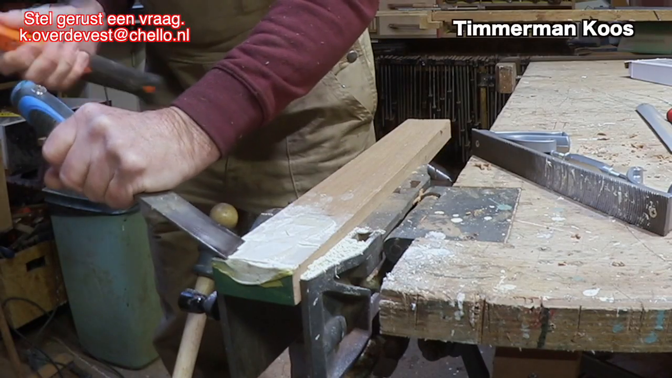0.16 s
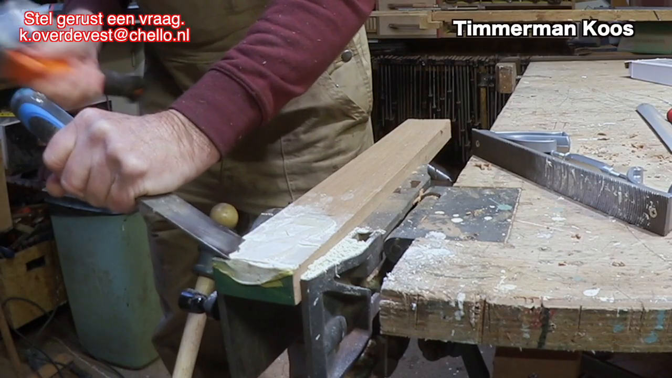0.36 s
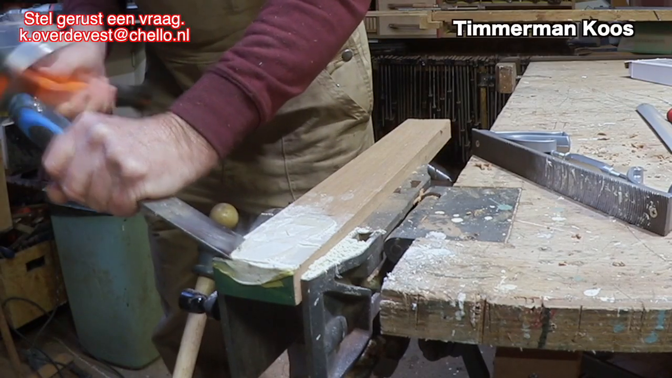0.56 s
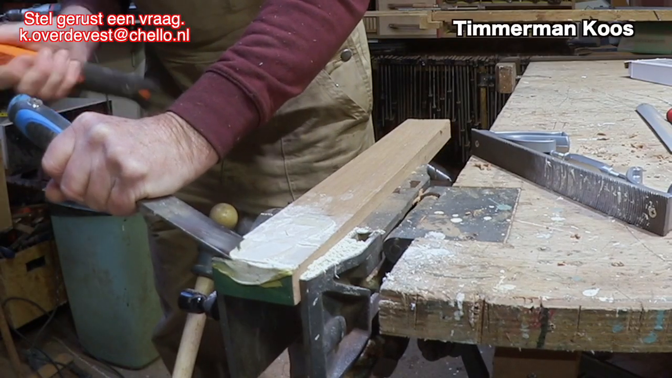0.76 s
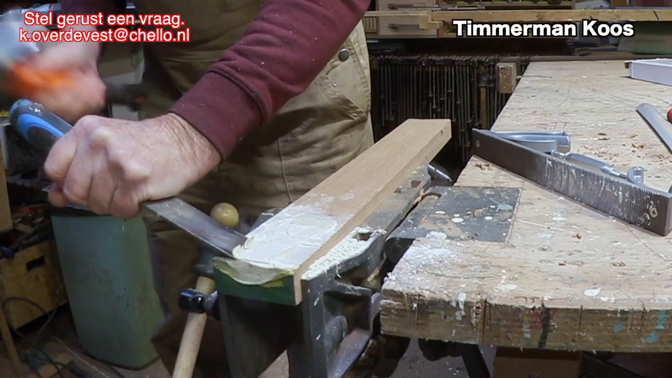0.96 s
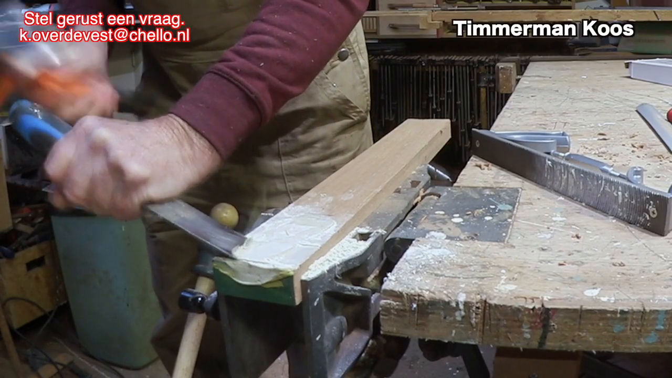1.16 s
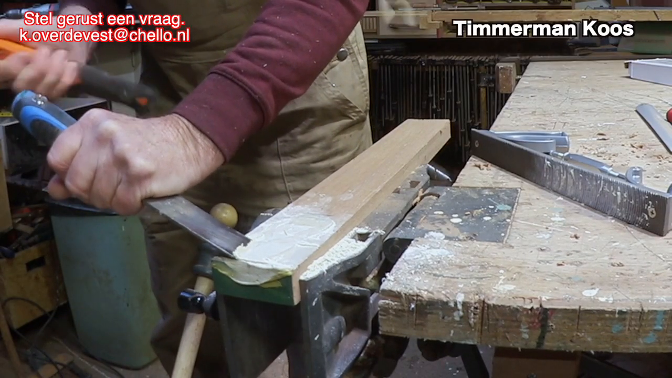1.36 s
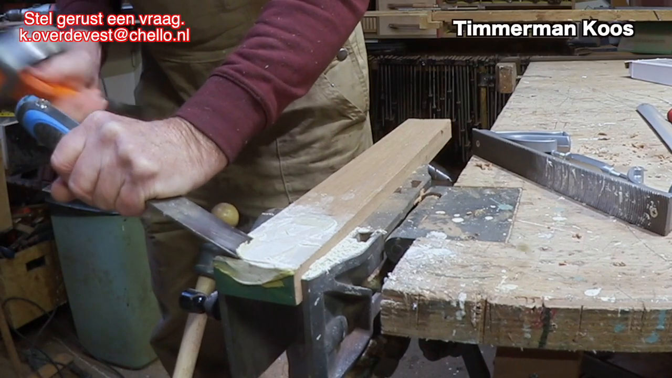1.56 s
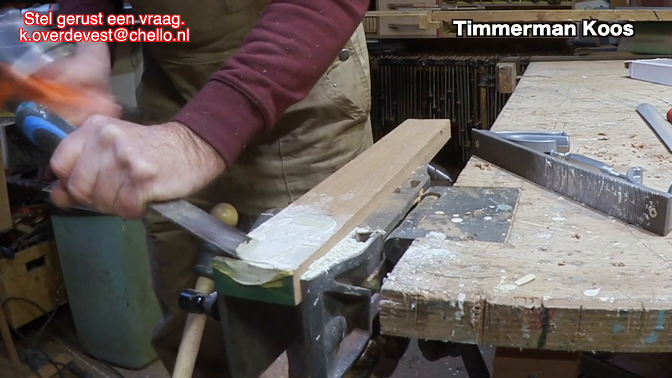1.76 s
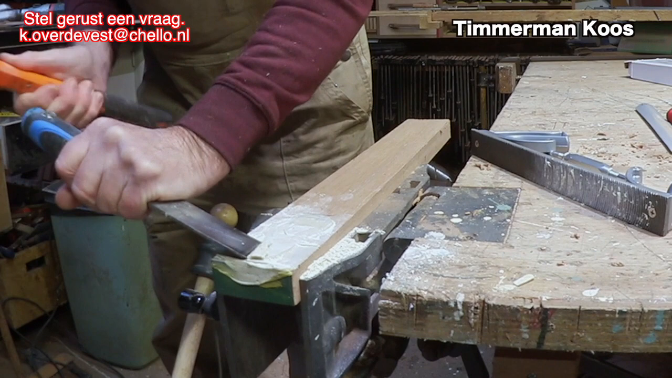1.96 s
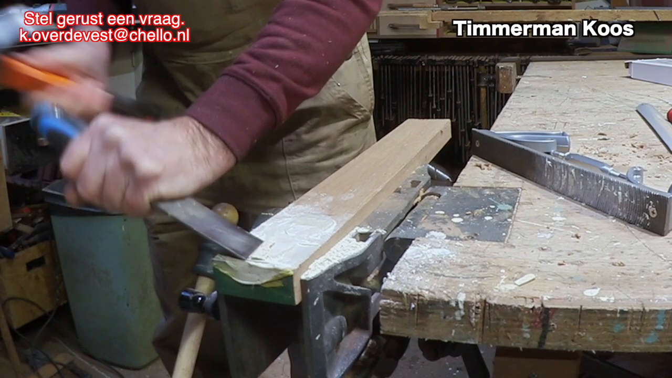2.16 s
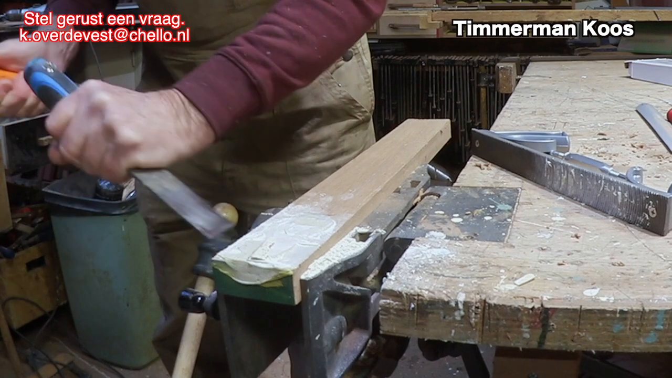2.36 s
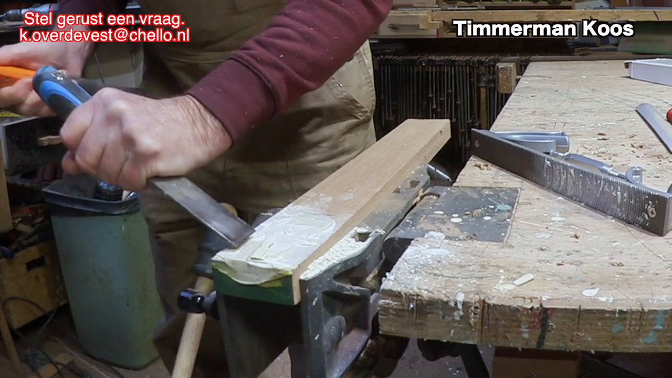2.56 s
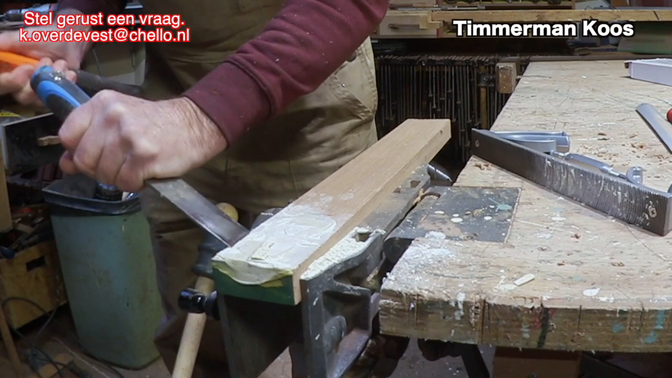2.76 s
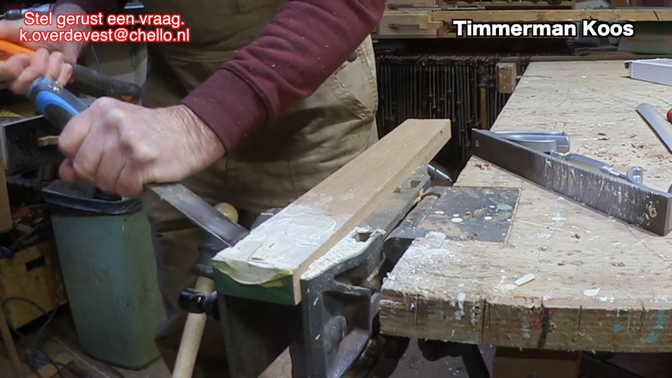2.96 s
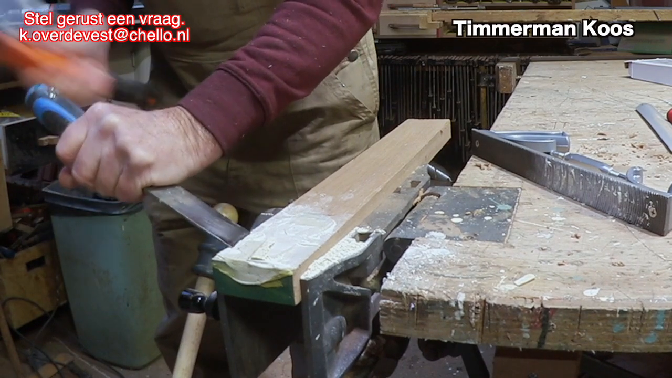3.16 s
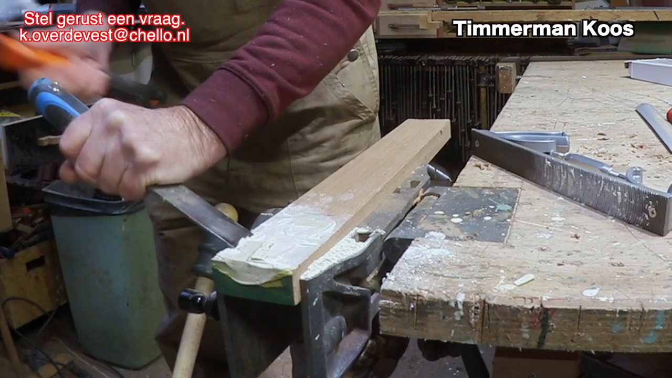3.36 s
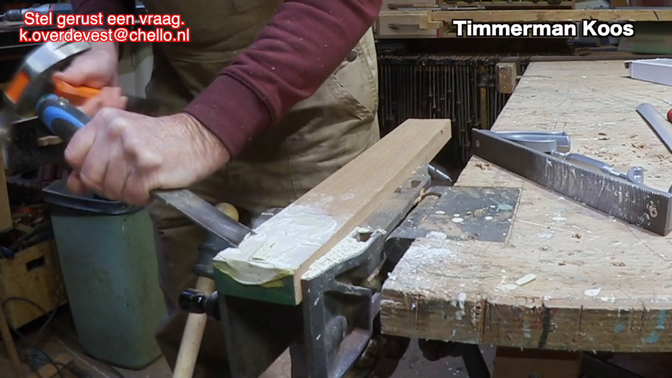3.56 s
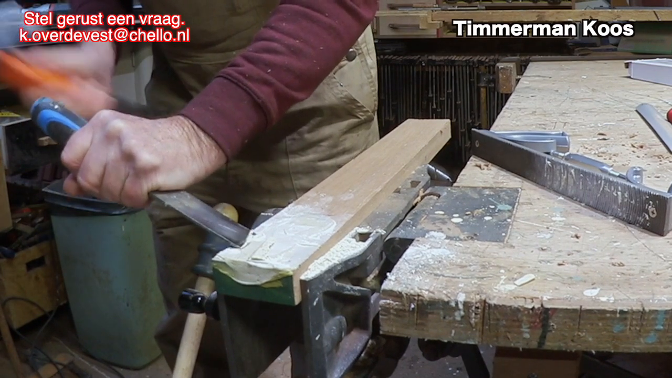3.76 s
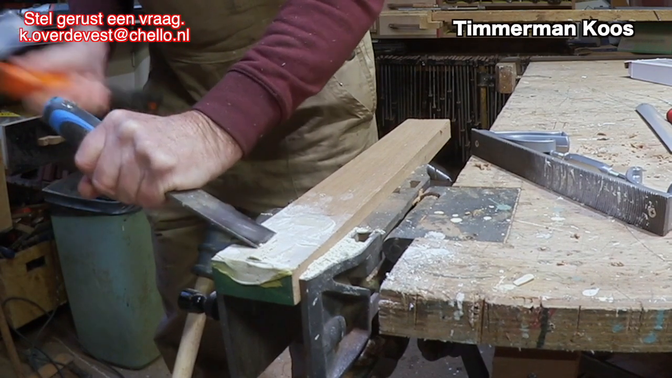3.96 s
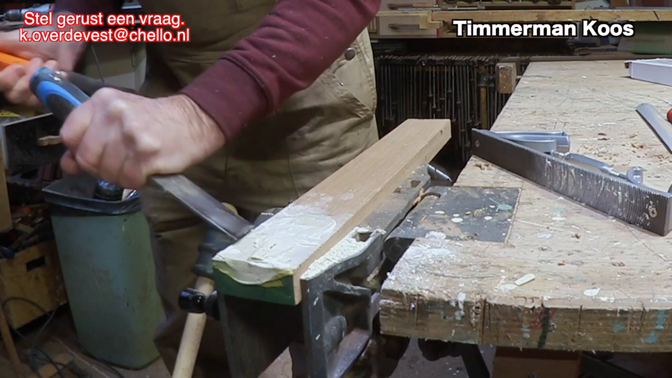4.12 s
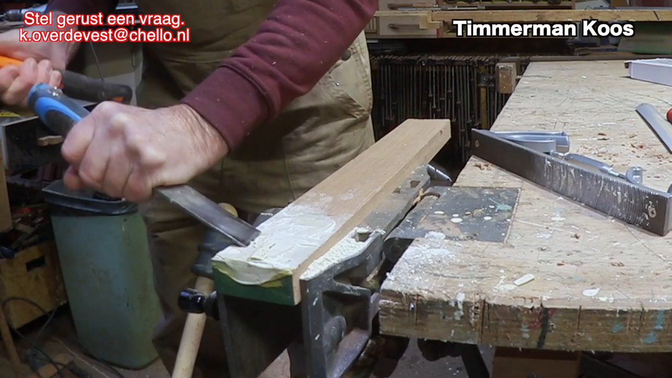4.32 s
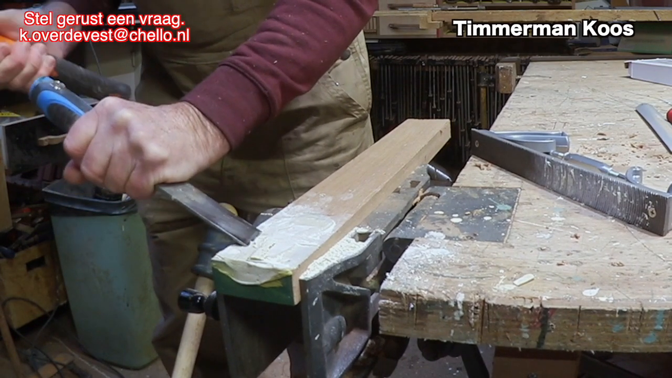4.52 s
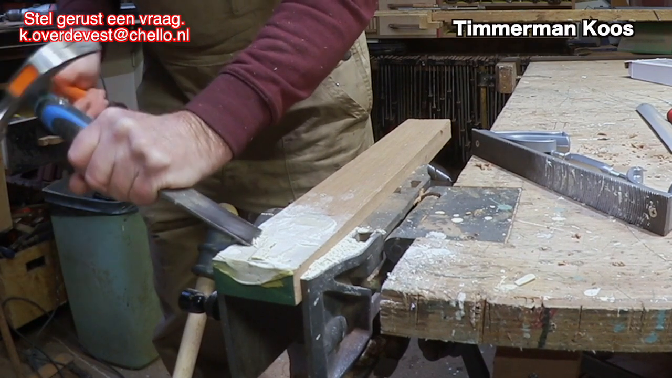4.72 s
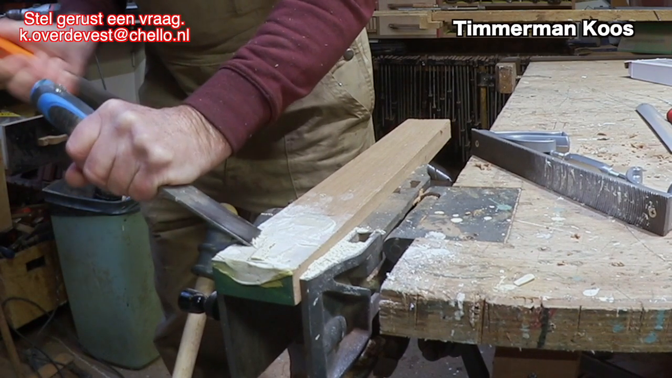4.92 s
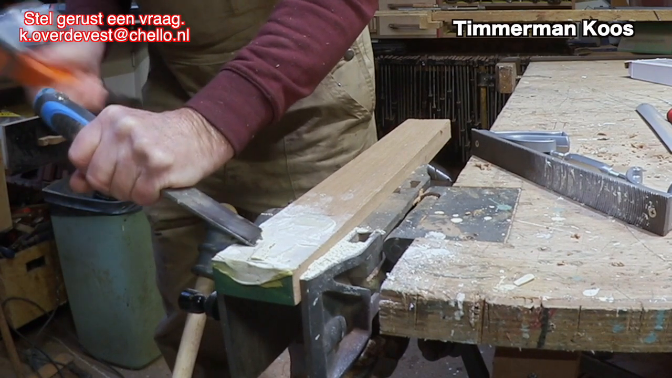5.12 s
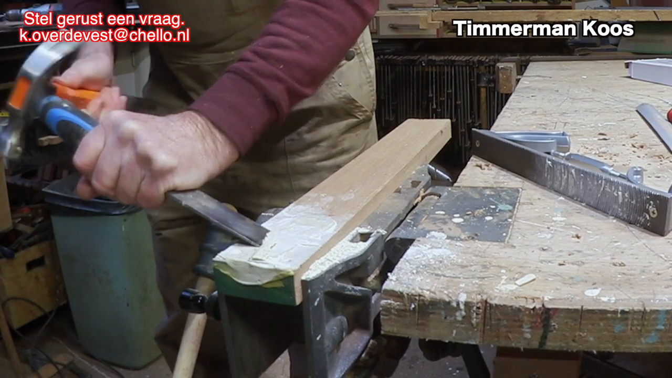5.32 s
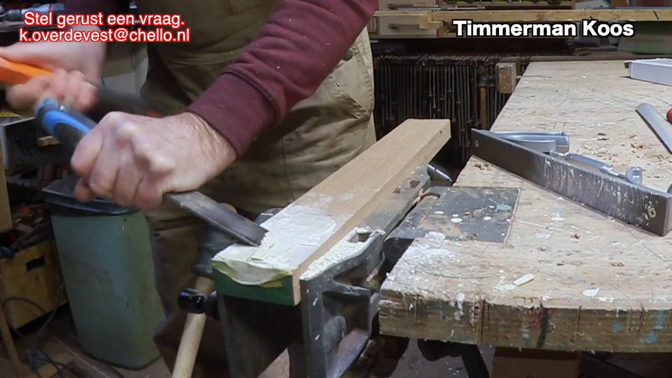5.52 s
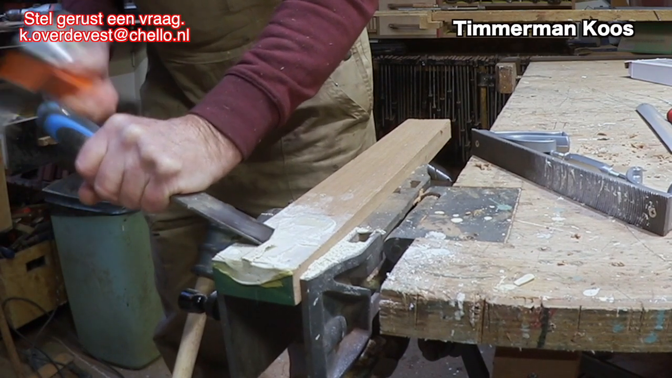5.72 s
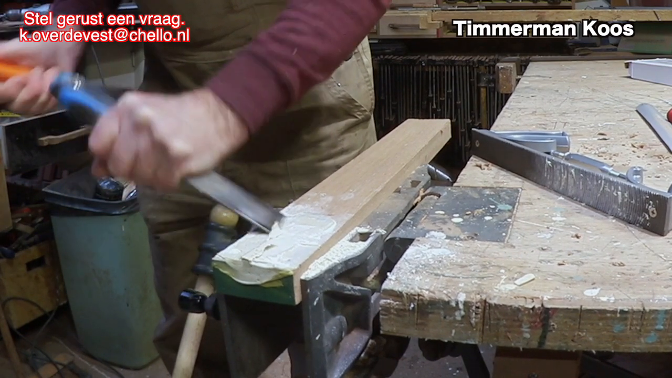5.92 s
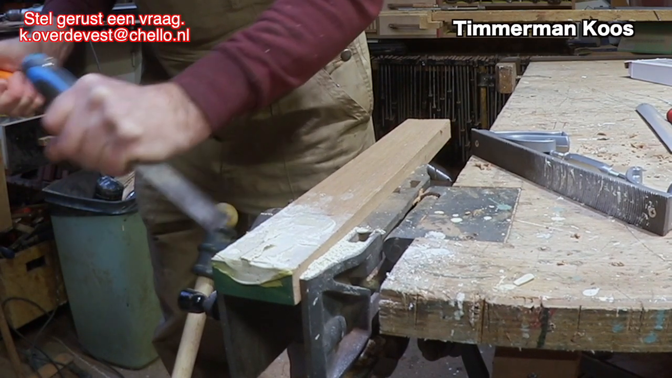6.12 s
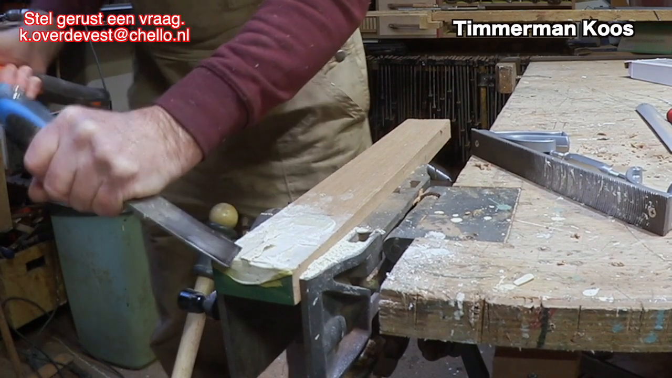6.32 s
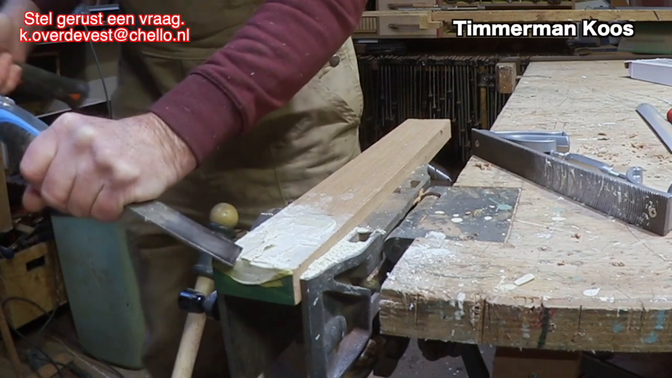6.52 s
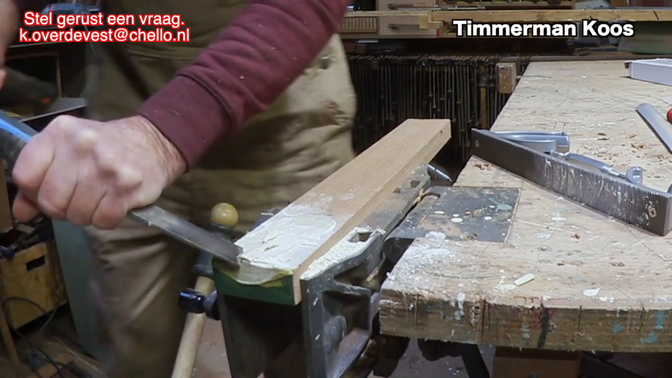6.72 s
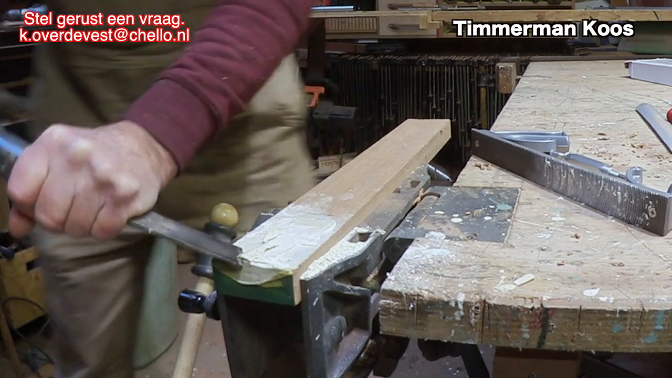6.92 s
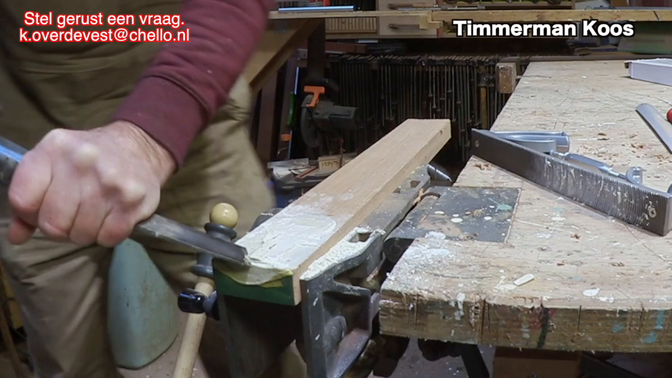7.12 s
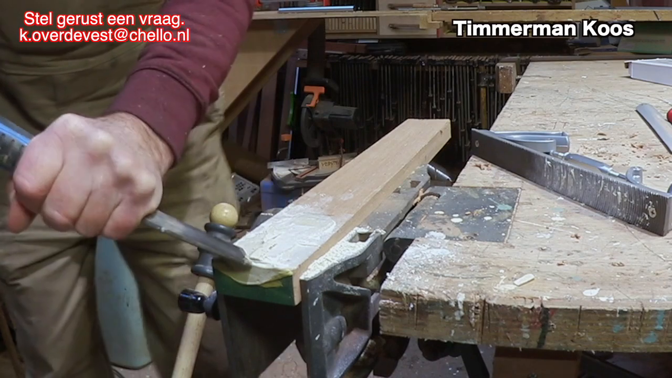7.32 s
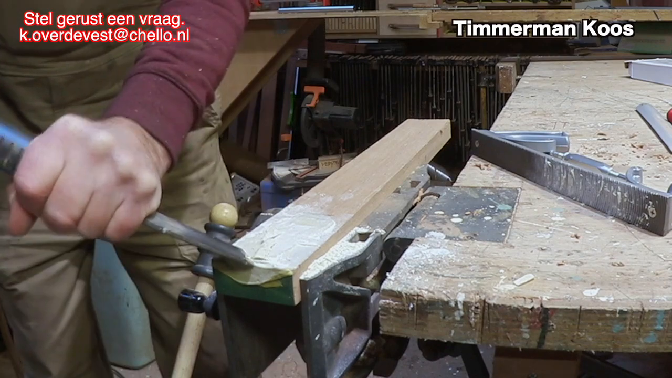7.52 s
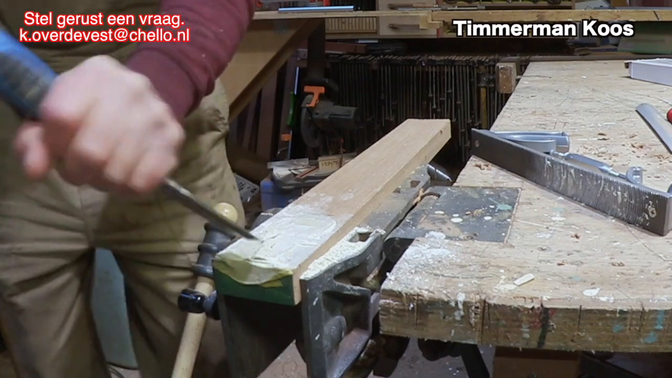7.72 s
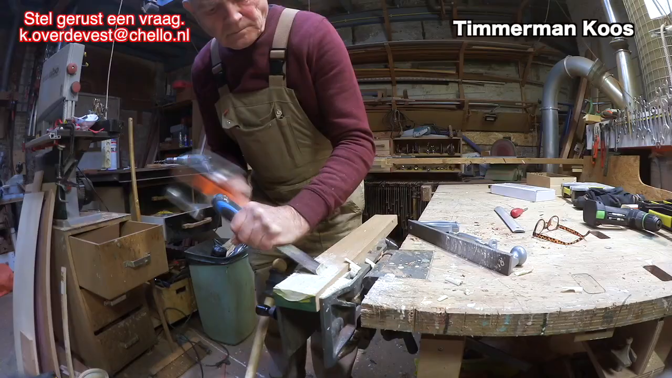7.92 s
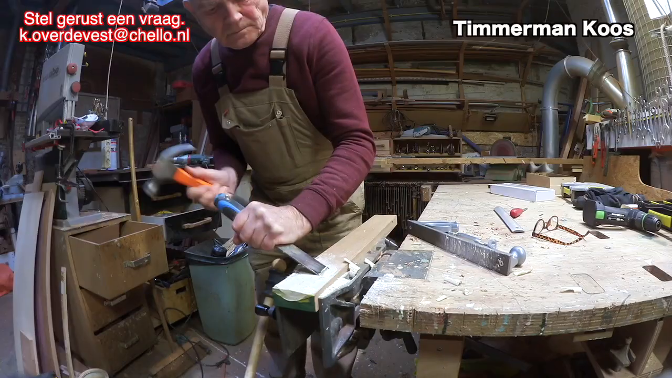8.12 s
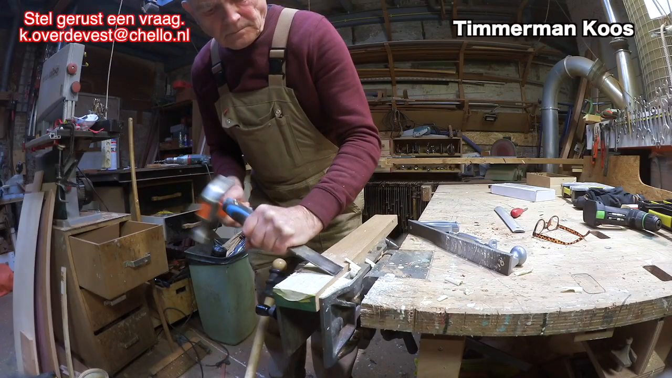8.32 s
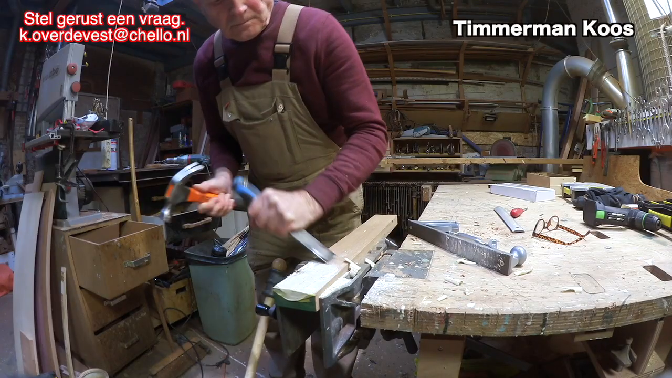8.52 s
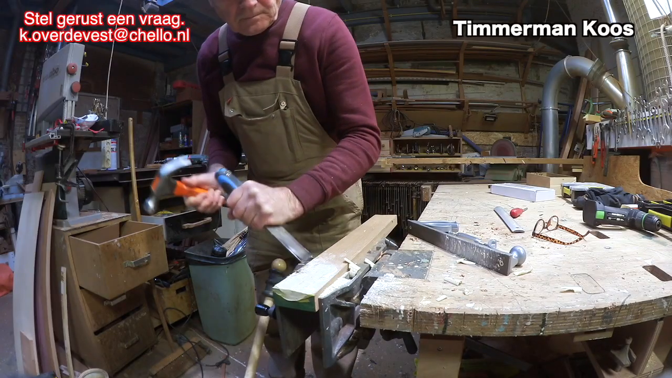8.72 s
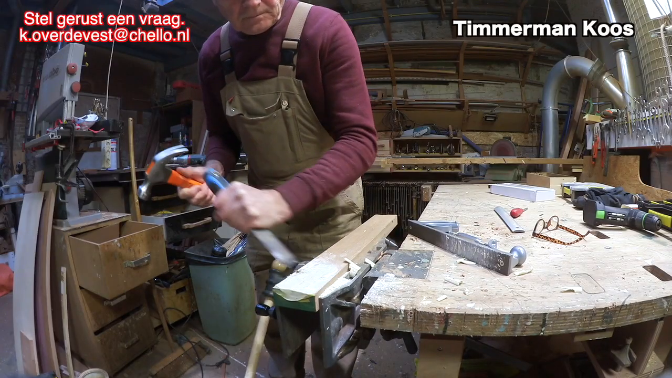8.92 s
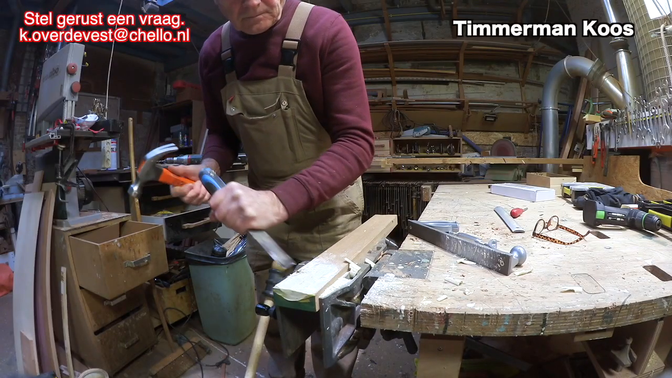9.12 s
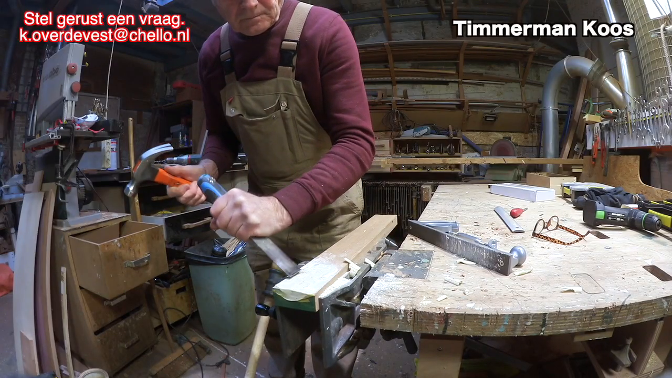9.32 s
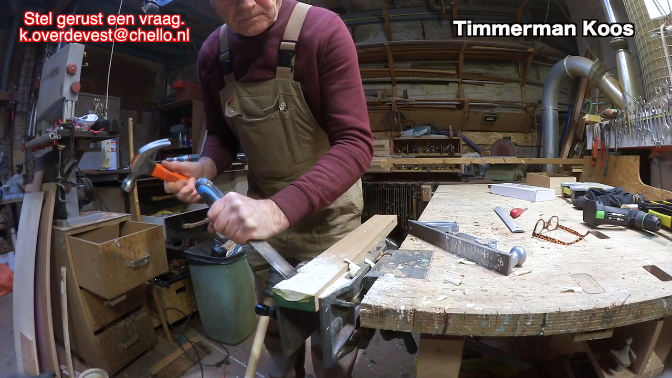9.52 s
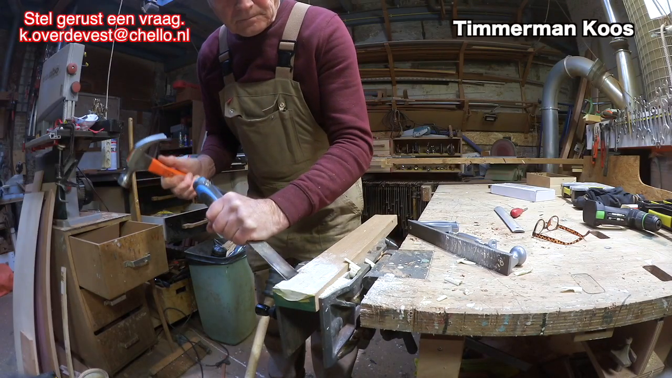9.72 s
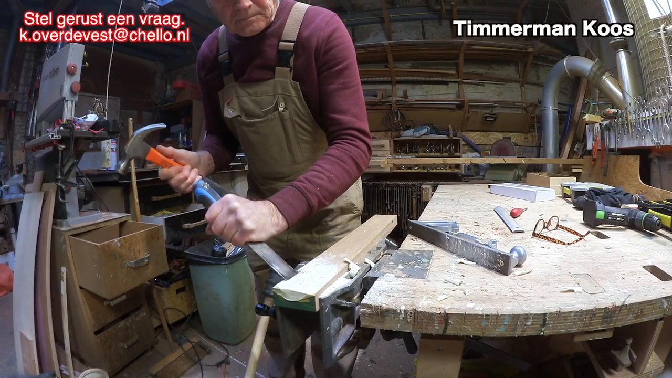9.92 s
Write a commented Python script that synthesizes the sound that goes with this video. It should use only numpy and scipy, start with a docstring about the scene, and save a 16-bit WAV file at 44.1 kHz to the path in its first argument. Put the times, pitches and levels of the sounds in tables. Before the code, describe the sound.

In a hard-walled workshop, a hammer strikes a chisel set in a clamped board: eight steady, loud cracks, a short pause, then shorter runs. Between them the blade slides grittily, knocks and rings on the wood, and chips snap. Soft hollow ticks sit behind. The close microphone is overloaded by each blow, its dense short echo held flat before dying.

```python
"""Hammer and chisel at the bench

A steel hammer drives a wood chisel into a board held in a bench vice, in a hard-walled workshop.
Blows are filtered pulses with wood and steel resonances and a noise-built echo; they overload the
recorder, whose limiter holds the echo flat before letting it die. Between the runs the chisel is set
down (ringing pulses) and slid on the wood (gritty noise), chips drop (crackle), and something ticks
softly behind (dull pulses) over quiet air noise."""
import sys
import numpy as np
from scipy import signal
from scipy.fft import rfft, irfft, next_fast_len
from scipy.io import wavfile
from scipy.ndimage import uniform_filter1d

SR = 44100
rng = np.random.default_rng(int(sys.argv[2]) if len(sys.argv) > 2 else 0)


def volts_from_decibels(level):
    """Turn decibel levels (scalar or array-like) into linear amplitude factors."""
    exponent = np.asarray(level, float) / 20
    return 10 ** exponent


def unload_wav(signal):
    """Save mono or channel-first audio to the path in sys.argv[1] as 16-bit WAV at rate SR, clipped to [-1, 1]."""
    wavfile.write(
        sys.argv[1],
        SR,
        np.round(np.clip(np.atleast_2d(signal).T, -1, 1) * 32767).astype(np.int16),
    )


N = 440118
LEAD = SR // 4   # samples of track ahead of time zero
HZ = np.fft.rfftfreq(4096, 1 / SR)
LOW = 1 / (1 + (HZ / 400) ** 2)   # share of the bench
BOARD = 1 / (1 + np.log2((HZ + 1) / 1000) ** 2 / .25)   # share of the board in the vice


def at_hz(points, hz):
    """Read a (Hz, value) table on a log-frequency axis."""
    f, v = np.transpose(points)
    return np.interp(np.log(hz + 1), np.log(f), v)


def rings_db(rings, hz):
    """Resonance humps, in dB."""
    return sum(db / (1 + (2 * (hz - f) / width) ** 2) for f, width, db in rings)


def strike(colour_db):
    """The sharpest causal (minimum-phase) pulse with this spectrum, peak 1."""
    cepstrum = irfft(np.log(volts_from_decibels(colour_db)))
    half = len(cepstrum) // 2
    cepstrum[1:half] *= 2
    cepstrum[half + 1:] = 0
    pulse = irfft(np.exp(rfft(cepstrum)))
    return pulse / np.abs(pulse).max()


def add(track, s, pulse):
    """Lay a pulse on a track that starts a quarter second early."""
    i = round(s * SR) + LEAD
    track[i:i + len(pulse)] += pulse[:len(track) - i]


def coloured(points, rings=()):
    """Steady noise with this spectrum and these resonances, rms 1."""
    size = next_fast_len(N)
    hz = np.fft.rfftfreq(size, 1 / SR)
    gain = volts_from_decibels(at_hz(points, hz) + rings_db(rings, hz))
    x = irfft(rfft(rng.standard_normal(size)) * gain, size)[:N]
    return x / x.std()


def strokes(s, db, held_s, fade_db_per_s, rise_db_per_s):
    """Gain of strokes that rise, hold and fade; their powers add."""
    points = np.arange(0, N, 32)
    since_full_s = points[:, None] / SR - s - .008   # full level 8 ms after the start
    rise_db = np.minimum(np.abs(rise_db_per_s) * since_full_s, 0)
    fade_db = np.abs(fade_db_per_s) * np.maximum(since_full_s - np.abs(held_s), 0)
    level_db = np.maximum(db + rise_db - fade_db, -140)
    return np.interp(np.arange(N), points, np.sqrt(np.sum(volts_from_decibels(level_db) ** 2, axis=1)))


def workshop(x, wet_db):
    """Dense echoes: every band of noise builds up, then dies at its own rate."""
    # Reverberation time. Each row: frequency in Hz, time to fall 60 dB in s.
    room_t60 = [(100, 0.62), (260, 0.59), (700, 0.45), (1840, 0.36), (4850, 0.33), (9000, 0.26),
                (14000, 0.061)]
    # Echo colour; shelves and wood swallow the top. Each row: frequency in Hz, relative gain in dB.
    room_gain = [(300, 7), (3000, -1), (9000, -3.5), (12000, -14.5), (16000, -23)]
    build_cycles = 1.2
    t = np.arange(SR) / SR
    edges_hz = 30 * 2 ** np.arange(0, 9.4, .5)
    white = rng.standard_normal((2, SR))   # neighbouring bands use different noise
    echo = np.zeros(SR)
    for k, (low, high) in enumerate(zip(edges_hz, edges_hz[1:])):
        hz = np.sqrt(low * high)
        sos = signal.butter(2, [low, high], "band", fs=SR, output="sos")
        band = signal.sosfilt(sos, white[k % 2])
        build = 1 - np.exp(-t / (0.00077 + build_cycles / hz))
        echo += band * build * volts_from_decibels(at_hz(room_gain, hz) - 60 * t / at_hz(room_t60, hz))
    echo /= np.sqrt(np.sum(echo ** 2))
    return (x + volts_from_decibels(wet_db) * signal.oaconvolve(x, echo)[:len(x)])[LEAD:]


def background():
    """Quiet workshop air is steady coloured noise; an even hiss sets in abruptly near the end."""
    # Air spectrum. Each row: frequency in Hz, relative density in dB per Hz.
    air_colour = [(18, -35), (30, -2), (291, -7), (432, -3.5), (676, -16.5), (1940, -13.5), (5300, -19),
                  (6380, -19.5), (10500, -26), (15200, -33), (16500, -45)]
    # Hiss spectrum. Each row: frequency in Hz, relative density in dB per Hz.
    hiss_colour = [(60, 26), (400, 2), (2500, 10), (8000, -3), (15600, -6), (15900, -37)]
    air_db, hiss_db, hiss_from_s = -68, -58, 9.557
    hiss_on = np.arange(N) >= hiss_from_s * SR
    return volts_from_decibels(air_db) * coloured(air_colour) + volts_from_decibels(hiss_db) * coloured(hiss_colour) * hiss_on


def soft_sounds():
    """Hollow background ticks and dull bumps of hand or handle on the bench, as filtered pulses."""
    # Ticks. Each row: start in s, peak in dB.
    tick_rows = [(2.446, -49), (2.596, -49.5), (2.755, -51.5), (4.149, -46.5), (4.306, -41), (4.611, -57),
                 (5.969, -42.5), (6.117, -41), (6.276, -44), (6.578, -48), (8.611, -44), (8.763, -48.5),
                 (8.845, -56), (8.928, -51), (9.086, -59), (9.227, -53.5), (9.371, -65)]
    # Tick spectrum. Each row: frequency in Hz, relative level in dB.
    tick_colour = [(150, -36), (350, -18), (440, 2), (500, -3), (560, 0), (660, -16), (1200, -30),
                   (2600, -32), (5000, -52)]
    # Bumps. Each row: start in s, peak in dB, centre in Hz.
    bump_rows = [(2.817, -51.5, 190), (2.899, -53, 277), (4.341, -40, 210), (5.974, -41, 408),
                 (6.388, -42, 280), (6.859, -52, 248), (6.933, -37, 256), (7.939, -45, 409),
                 (9.656, -41.5, 211), (9.678, -48, 178), (9.78, -45, 323), (9.797, -40, 267),
                 (9.884, -49.5, 280)]
    out = np.zeros(N + LEAD)
    for s, db in tick_rows:
        add(out, s, volts_from_decibels(db) * strike(at_hz(tick_colour, HZ)))
    for s, db, hz in bump_rows:
        colour_db = np.maximum(-16.0 * np.log2((HZ + 20) / hz) ** 2, -70)
        add(out, s, volts_from_decibels(db) * strike(colour_db))
    return out


def handling():
    """Sliding steel on wood is gritty noise; the bench rumbles under the hands."""
    # Blade slides. Each row: start in s, scrape level in dB, fine bright scrape level in dB,
    # held time in s, fade in dB per s.
    slide_rows = [(2.79, -58.5, -71, .005, 400), (2.85, -69.5, -84, .13, 100), (2.985, -62, -69, .005, 202),
                  (3.02, -68, -77, .08, 101), (3.1, -64, -70.5, .15, 103), (4.14, -117, -72, .03, 121),
                  (4.323, -46.5, -57.5, .005, 246), (4.5, -65.5, -71, .03, 76), (5.878, -49, -55, .08, 185),
                  (6.198, -51.5, -71, .008, 303), (6.25, -64, -72, .12, 100), (6.376, -48, -53.5, .05, 120),
                  (6.52, -61.5, -64.5, .32, 100), (6.848, -50, -53, .01, 106),
                  (7.26, -44, -48.5, .008, 354), (7.314, -47.5, -51.5, .01, 270),
                  (7.6, -55, -54.5, .11, 182), (7.83, -56.5, -58.5, .09, 116),
                  (7.962, -50, -67, .02, 201.5), (8.488, -51, -53.5, .065, 216),
                  (8.68, -58, -66, .005, 452), (8.84, -66.5, -72, .005, 148.5), (8.901, -74, -77.5, .2, 30),
                  (9.43, -82, -70, .005, 194), (9.557, -62, -54, .02, 55), (9.808, -55, -54.5, .025, 300),
                  (9.85, -79, -67, .13, 50)]
    # The blade sings as it slides. Each row: frequency in Hz, width in Hz, gain in dB.
    slide_rings = [(2620, 110, 3.5), (3100, 200, 1.5), (5200, 160, 1.5)]
    # Scrape spectrum. Each row: frequency in Hz, relative density in dB per Hz.
    scrape_colour = [(350, -26.5), (600, -2.5), (646, -16.5), (884, -10), (1690, -9.5), (1810, -8),
                     (3040, -10.5), (4300, -17.5), (5590, -39), (9460, -120)]
    # Fine scrape spectrum. Each row: frequency in Hz, relative density in dB per Hz.
    fine_colour = [(2530, -22.5), (4300, -3), (5540, 5), (8360, 0), (12700, -19), (13400, -34.5),
                   (16000, -38)]
    # Bench rumbles. Each row: start in s, level in dB, held time in s, fade in dB per s.
    shift_rows = [(2.79, -57, 0.023, 111), (3.0, -68, 0.042, 81), (3.17, -73, 0.072, 110.5),
                  (4.14, -63, 0.016, 102), (4.325, -47.5, 0.067, 149), (5.881, -54.5, 0.038, 72),
                  (6.02, -62.5, 0.025, 100), (6.385, -54, 0.027, 120), (6.52, -71, 0.28, 100),
                  (6.848, -52.5, 0.011, 110), (7.24, -58.5, .09, 153), (7.59, -91, 0.016, 170),
                  (7.89, -54, 0.076, 201.5), (8.49, -52, 0.044, 93), (8.86, -68.5, 0.043, 50),
                  (9.557, -61.5, 0.32, 100), (9.805, -57, 0.033, 200), (9.85, -63.5, .13, 100)]
    # Rumble spectrum. Each row: frequency in Hz, relative density in dB per Hz.
    rumble_colour = [(24, -43), (40, -14.5), (134, -13), (189, -4), (362, -6.5), (501, -21), (641, -11),
                     (900, -14.5), (1170, -42.5), (1980, -120)]
    slide_rise_db_per_s, shift_rise_db_per_s = 1493, 700
    s, scrape_db, fine_db, held_s, fade = np.transpose(slide_rows)
    slow_noise = uniform_filter1d(rng.standard_normal(N), size=300) * np.sqrt(300)
    grit = volts_from_decibels(2.2 * slow_noise)   # 2.2 dB rms
    coarse = strokes(s, scrape_db, held_s, fade, slide_rise_db_per_s) * coloured(scrape_colour, slide_rings)
    fine = strokes(s, fine_db, held_s, fade, slide_rise_db_per_s) * coloured(fine_colour, slide_rings)
    rumble = strokes(*np.transpose(shift_rows), shift_rise_db_per_s) * coloured(rumble_colour)
    return grit * (coarse + fine) + rumble


def chips():
    """A chip snapping or landing is a few ms of crackle around its own pitch."""
    # Each row: start in s, peak in dB, centre in Hz, loss one octave away in dB (sign ignored).
    chip_rows = [(2.6774, -47.5, 2220, 18), (4.1848, -32, 2860, -11), (4.4782, -43, 3140, -2),
                 (4.54, -48.5, 2940, 32), (5.8835, -23, 5180, 8.5), (6.034, -58, 2770, 6),
                 (6.3475, -47, 2340, 27), (6.577, -45, 5790, 24), (6.637, -35.5, 3070, -4),
                 (6.699, -43, 6010, 21), (6.822, -42, 2740, 18), (7.2408, -30.5, 2000, 4),
                 (7.6082, -41, 2860, 13.5), (7.633, -32.5, 2960, 4), (7.667, -29, 2170, 0),
                 (7.6994, -36.5, 3390, 18), (8.498, -30, 5210, 9), (8.525, -30, 2980, 19),
                 (8.5512, -33, 3040, 12), (8.8454, -50, 2460, 12), (9.8129, -22, 7440, 6),
                 (9.8307, -26.5, 2880, 25)]
    out = np.zeros(N + LEAD)
    decay = np.exp(-np.arange(300) / SR / .002)
    crackle = rng.standard_normal((len(chip_rows), 300)) * decay
    for (s, db, hz, fall_db), burst in zip(chip_rows, crackle):
        colour_db = -abs(fall_db) * np.log2((HZ + 50) / hz) ** 2 - 5.4 * (HZ / 11000) ** 4
        pulse = np.convolve(strike(colour_db), burst)
        add(out, s, volts_from_decibels(db) * pulse / np.abs(pulse).max())
    return out


def knocks():
    """The blade is set down on the wood, rings briefly and settles: two pulses with resonances."""
    # Each row: start in s (sounds 2 ms later), pulse peak in dB, low gain in dB, bright gain in dB,
    # blade ring in dB.
    knock_rows = [(2.795, -41, -9, -7, 19), (2.987, -43, -6, -13, 18), (4.326, -24.5, 4, -10, 17),
                  (5.944, -27.5, -8, -2, 17.5), (6.201, -48, -19.5, -16, 21), (6.376, -31, -23, -20, 17.5),
                  (6.849, -34.5, 24, -23, 8), (7.266, -31, 12, -11.5, -1), (7.322, -35.5, -5, 19.5, 14.5),
                  (7.712, -33.5, -11.5, 11.5, 21), (7.897, -33.5, 15, 6.5, 4), (7.957, -30, 7, -15, 1)]
    # Knock spectrum. Each row: frequency in Hz, relative level in dB.
    knock_colour = [(47, -40), (80, -45.5), (248, -19), (1490, -15.5), (1700, -5), (2220, -49),
                    (3030, -17.5), (8790, -22.5), (16000, -77)]
    # Knock resonances. Each row: frequency in Hz, width in Hz, gain in dB.
    knock_rings = [(280, 68, 0), (680, 120, 9), (950, 200, 5), (2950, 250, 11.5)]
    blade_hz, blade_width_hz = 1717, 120
    out = np.zeros(N + LEAD)
    bright = 1 / (1 + (3000 / (HZ + 1)) ** 2)
    for s, db, low_db, bright_db, ring_db in knock_rows:
        rings = rings_db(knock_rings + [(blade_hz, blade_width_hz, ring_db)], HZ)
        pulse = strike(at_hz(knock_colour, HZ) + rings + low_db * LOW + bright_db * bright)
        add(out, s + .002, volts_from_decibels(db) * pulse)   # the knock sounds 2 ms after the listed start
        add(out, s + .007, volts_from_decibels(db - 8.0) * pulse)   # the blade settles
    return out


def hammer():
    """Each blow rings wood and steel a little differently; the chisel jumps and lands again in a few ms."""
    # Each row: start in s, strength in dB, bench thud gain in dB, board ring gain in dB.
    blow_rows = [(-0.004, 8, 2.5, 2), (0.3083, 14.5, -2.5, 1.5), (0.6176, 17, 1.2, 0), (0.919, 16.5, 0, 0),
                 (1.223, 16, 0, -0.5), (1.526, 17, 3, 4), (1.83, 15.5, 2, 1.2), (2.118, 9, 1, -1.5),
                 (3.248, 10, -8, -4), (3.557, 13, -1.5, 1), (3.855, 12.5, -8, -2), (4.7376, 11.5, -5, -2),
                 (5.054, 16, -3, -4.5), (5.361, 16, -1, -1), (5.651, 13, -3.5, 1.7), (7.0094, 8, -3.5, 3.5),
                 (7.4108, 7, -3.5, -9), (7.988, 16, -2.2, 4), (8.284, 13, -3.5, 6)]
    # Blow spectrum. Each row: frequency in Hz, relative level in dB.
    blow_colour = [(35, -60), (60, -32), (147, -4), (229, -17), (358, -12.5), (900, -6), (1570, -2.5),
                   (2640, 5.5), (3930, -2), (4600, -0.5), (5220, 3.5), (6000, 4), (8540, -1.5),
                   (11000, -14), (14000, -16.5), (17000, -25.5)]
    # Chisel and board resonances. Each row: frequency in Hz, width in Hz, gain in dB.
    wood_rings = [(123, 8.7, -10.5), (368, 78, 5), (649, 69, 4.5), (1048, 180, 4.5), (1740, 44, 3),
                  (1970, 33, 2.5), (2340, 60, 4), (2640, 260, -0.5), (2880, 380, 3)]
    # Steel resonances. Each row: frequency in Hz, width in Hz, gain in dB.
    steel_rings = [(5150, 380, 7), (6750, 520, 6)]
    # The deeper a hard blow buries the edge, the less the steel rings.
    # Each row, one per steel ring: added gain in dB at a 12 dB blow, loss in dB per dB of strength.
    steel_damping = [(0.2, 0.57), (1.501, 0.57)]
    stances = 4   # places of the hammer, taken in turn, each with its own pattern of echoes
    tracks = np.zeros((stances, N + LEAD))
    chance = rng.standard_normal((len(blow_rows), 3 + len(HZ)))
    for k, ((s, db, thud_db, board_db), luck) in enumerate(zip(blow_rows, chance)):
        out = tracks[k % stances]
        bite = 1 + .012 * luck[2]   # the steel's pitch shifts with how deep the edge sits
        steel = [(f * bite, width, gain_db + more_db - loss * (db - 12))
                 for (f, width, gain_db), (more_db, loss) in zip(steel_rings, steel_damping)]
        # random ripple of each blow's spectrum, 1.5 dB rms: small chance differences in tone
        ripple = uniform_filter1d(uniform_filter1d(luck[3:], size=14), size=14)
        ripple_db = 1.5 * ripple / ripple.std()
        colour_db = at_hz(blow_colour, HZ) + rings_db(wood_rings + steel, HZ)
        colour_db = colour_db + thud_db * LOW + board_db * BOARD
        pulse = strike(colour_db + ripple_db)
        add(out, s, volts_from_decibels(db) * pulse)
        add(out, s + .004 + .0004 * luck[0], volts_from_decibels(db - 10) * pulse)
        add(out, s + .0075 + .0006 * luck[1], volts_from_decibels(db - 13) * pulse)
    return tracks


def scene():
    """One microphone feeds both channels."""
    blows = sum(workshop(track, wet_db=5) for track in hammer())
    near = workshop(knocks() + chips(), wet_db=-12)   # close to the microphone, little echo
    soft = workshop(soft_sounds(), wet_db=-9)
    mono = background() + soft + handling() + near + blows
    return np.array([mono, mono])


def limit(x, ceiling_db, window_s, attack_s, release_db_per_s, ahead_s):
    """Turn down what passes the ceiling; gain drops in attack_s, its target climbs at a steady rate."""
    size = max(round(window_s * SR), 1)
    power = np.convolve(x ** 2, np.ones(size) / size)[:N]
    ramp_db = release_db_per_s * np.arange(N) / SR
    held_db = np.maximum.accumulate(10 * np.log10(power + 1e-12) + ramp_db) - ramp_db
    over_db = np.maximum(held_db - ceiling_db, 0)
    r = np.exp(-1 / (attack_s * SR))
    cut_db = signal.lfilter([1 - r], [1, -r], over_db, zi=[r * over_db[size]])[0]
    return x * volts_from_decibels(-np.interp(np.arange(N) + ahead_s * SR, np.arange(N), cut_db))


def low_pass(x):
    """Removes everything above the highest recorded frequency."""
    return signal.sosfilt(signal.butter(12, 17050, fs=SR, output="sos"), x)


def record(dry):
    """Bass cut of the microphone, a late limiter on the echo, a quicker one on the crack, overload."""
    x = signal.sosfilt(signal.butter(2, 85, "high", fs=SR, output="sos"), dry[0])
    # negative ahead_s: the gain acts late
    x = limit(x, ceiling_db=-23.0, window_s=.012, attack_s=.0012, release_db_per_s=291.5, ahead_s=-.0066)
    x = limit(x, ceiling_db=-14.5, window_s=.002, attack_s=.003, release_db_per_s=2500, ahead_s=0)
    x = .38 * np.tanh(x / .38)   # the first peaks overload
    x = signal.sosfilt(signal.butter(3, [35, 15500], "band", fs=SR, output="sos"), x)
    return low_pass(np.array([x, x]))


dry = scene()
out = record(dry)
unload_wav(out)
```